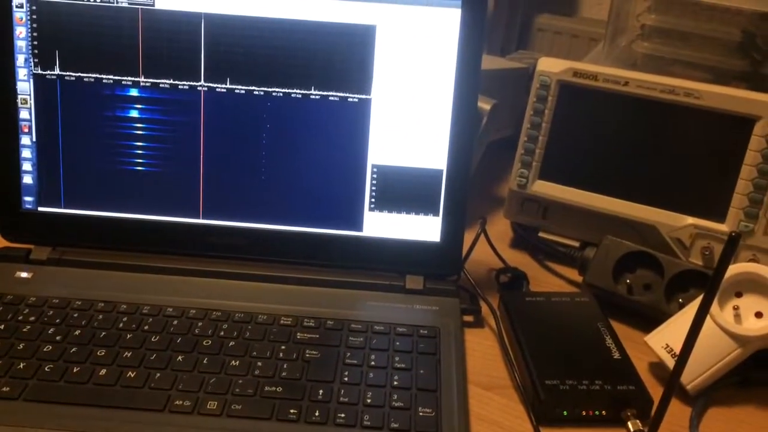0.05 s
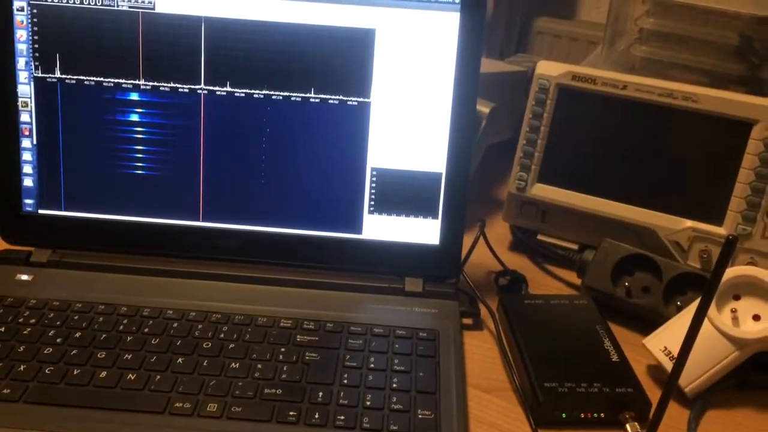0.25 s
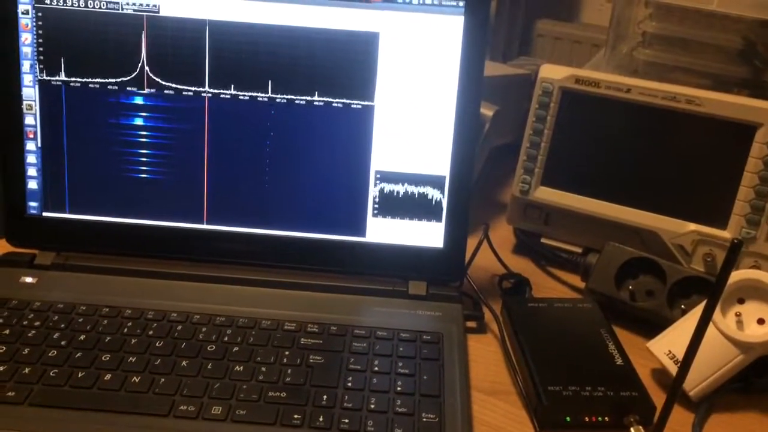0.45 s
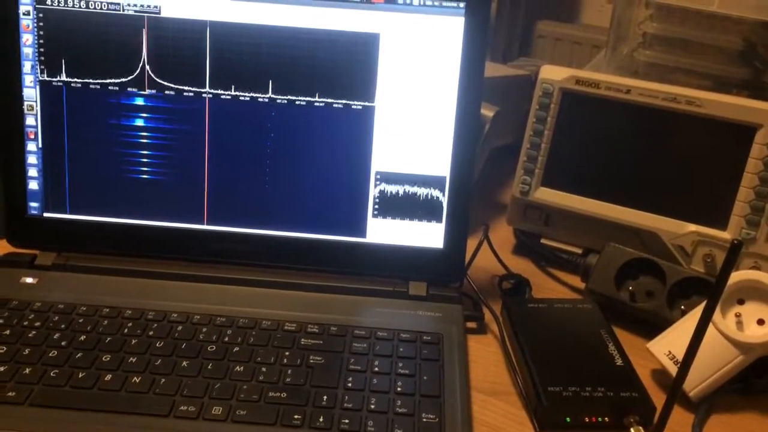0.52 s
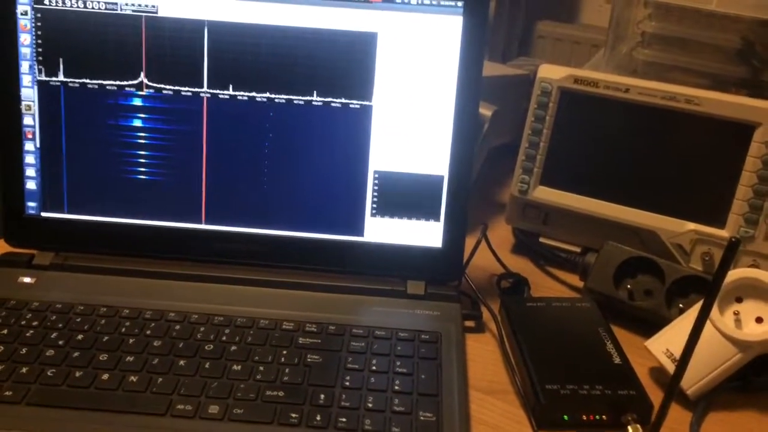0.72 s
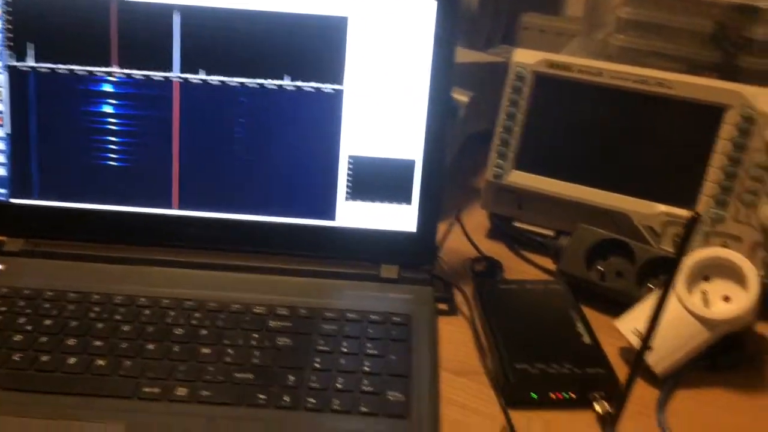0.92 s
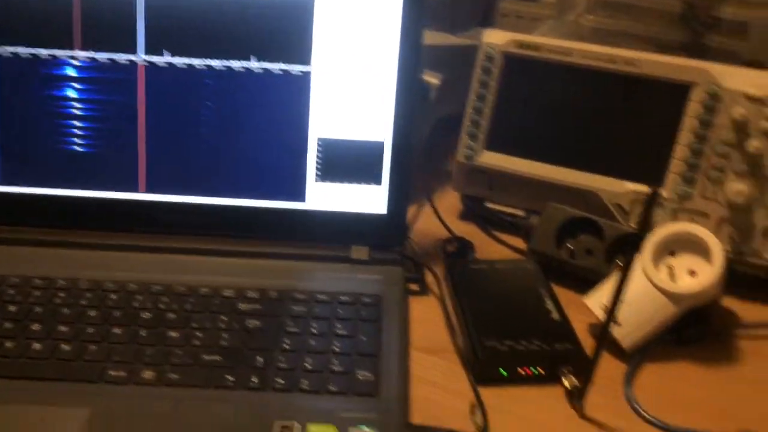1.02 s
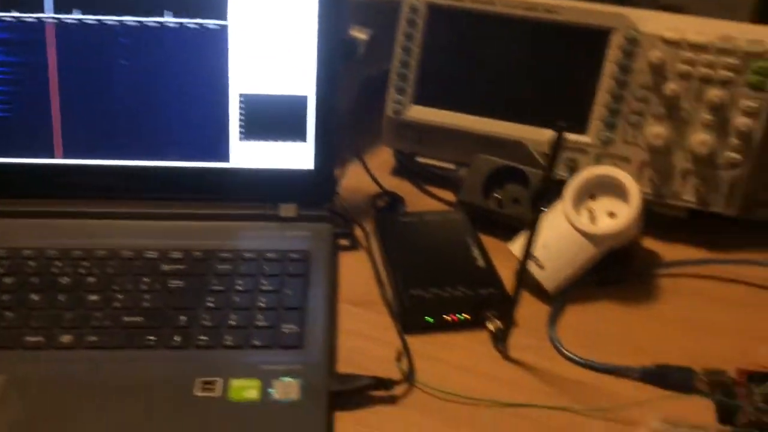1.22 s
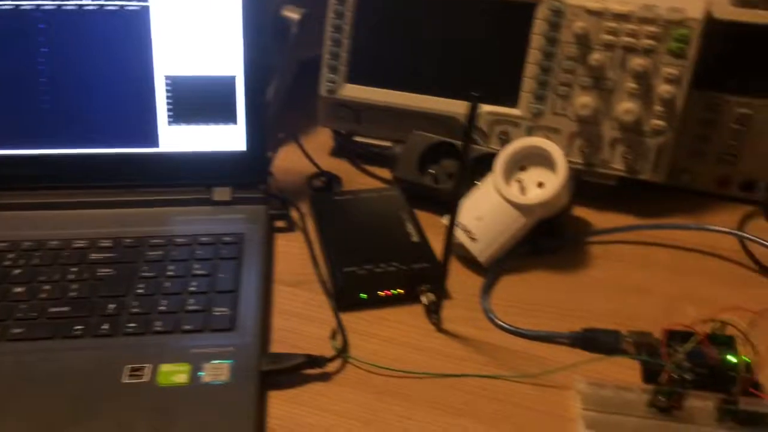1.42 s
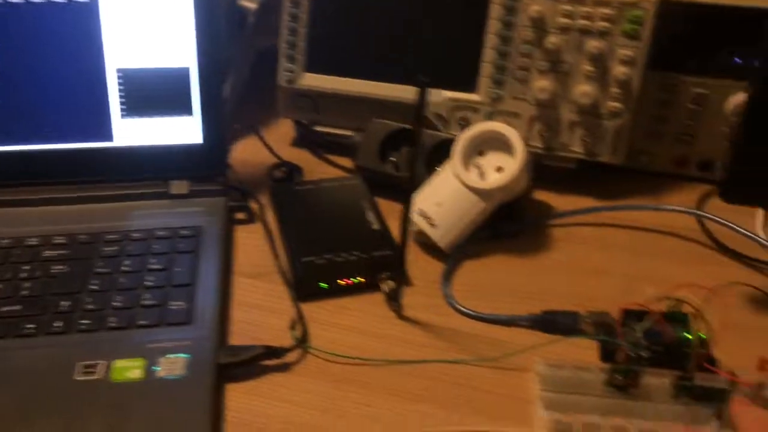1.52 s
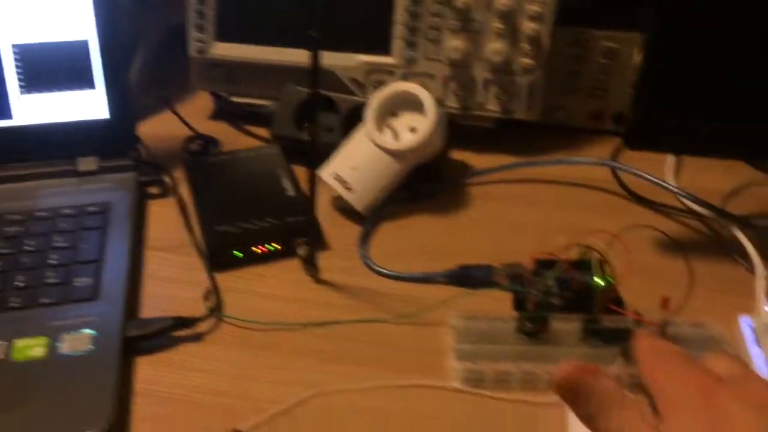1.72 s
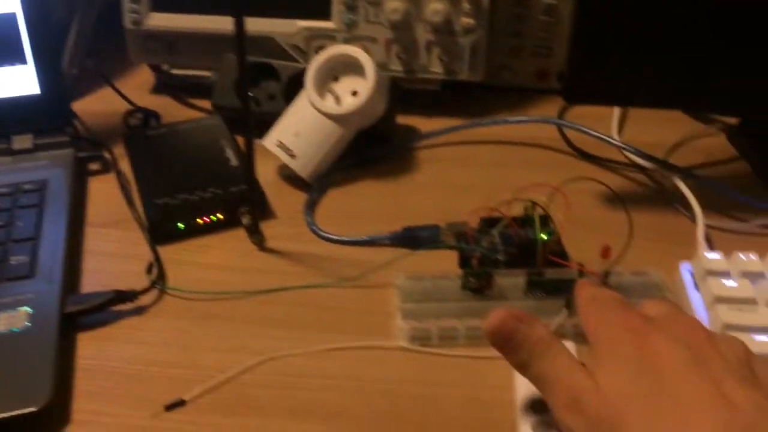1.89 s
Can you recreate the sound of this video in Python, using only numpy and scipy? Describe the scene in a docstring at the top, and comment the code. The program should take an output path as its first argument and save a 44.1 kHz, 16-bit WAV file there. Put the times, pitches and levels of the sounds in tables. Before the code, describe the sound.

A sharp button click, then a duller release click, in a quiet room.

```python
"""A desk in a quiet room: a small push-button switch is pressed and let go.
The press rings its body in a bright, gritty snap with quick echoes off the desk; plastic scuffs at the
stop and the spring twangs low. The release snaps more dully and a faint scuff follows. Underneath,
equipment fans hiss and whine softly, a sleeve rustles and a hand nudges the microphone."""
import sys
import numpy as np
from scipy import signal
from scipy.fft import rfft, irfft
from scipy.io import wavfile
from scipy.ndimage import uniform_filter1d

SR = 44100
rng = np.random.default_rng(int(sys.argv[2]) if len(sys.argv) > 2 else 0)


def transcribe(u):
    """Save the signal u as a 16-bit wav file named by the first command-line argument.

    u: samples, shape (n,) or (channels, n), limited to [-1, 1]; the rate is SR.
    q: integer samples, one column per channel.
    """
    v = np.clip(np.atleast_2d(u).T, -1, 1)
    q = np.round(v * 32767).astype(np.int16)
    wavfile.write(sys.argv[1], SR, q)


N = 85995
TIME_S = np.arange(N) / SR

# Press click and its three quick echoes off the desk: (time [s], level [dB])
PRESS_CLICKS = [(0.2025, 2), (0.2044, -24.5), (0.2056, -11.5), (0.2067, -29.5)]


def switch():
    """Press and release strike the same modes at different levels; returns direct sound, room feed."""
    # Three closely spaced clicks of the release: (time [s], level [dB])
    release_clicks = [(0.4928, 3.5), (0.4936, -5.5), (0.4946, -5)]
    # Modes of switch and mount: (frequency [Hz], t60 [s], press gain [dB], release gain [dB])
    body_modes = [(345, .025, -59.5, -46.5), (830, 0.023, -40.5, -31), (1145, 0.0044, -25, -31.5),
                  (1873, 0.0086, -25, -27.5), (2185, .008, -23, -26), (2480, 0.011, -22, -29),
                  (3480, 0.014, -21, -35.5), (4500, 0.018, -20.5, -40), (5005, .004, -24.5, -37.5),
                  (5940, .003, -13.5, -33.5), (6620, 0.0031, -12.5, -34.5), (9800, .004, -32.5, -37),
                  (13600, 0.0046, -38.5, -40)]
    # Grit of press, then release: (time [s], level [dB], tilt [dB/octave])
    cracks = [(0.2025, -22.5, 0), (0.4929, -34, -4.5)]
    press_modes = [(hz, db, t60_s) for hz, t60_s, db, _ in body_modes]
    release_modes = [(hz, db, t60_s) for hz, t60_s, _, db in body_modes]
    press, press_feed = snap(PRESS_CLICKS, press_modes, cracks[0], low_cut_hz=620)
    release, release_feed = snap(release_clicks, release_modes, cracks[1], low_cut_hz=287)
    # The release sends less treble into the room.
    low, high = (butterworth(release_feed, order=3, hz=2820, kind=kind) for kind in ("low", "high"))
    return press + release, press_feed + from_db(1.5) * low + from_db(-3.5) * high


def snap(clicks, modes, grit, low_cut_hz, body_send_db=-3, crack_send_db=2.5):
    """Clicks ring a body too small to radiate much bass; returns direct sound, room feed."""
    body = struck(impulses(clicks), modes)
    burst = crack(*grit)
    feed = from_db(body_send_db) * body + from_db(crack_send_db) * burst
    return butterworth(np.array([body + burst, feed]), order=2, hz=low_cut_hz, kind="high")


def crack(start_s, level_db, tilt_db_per_oct):
    """A few milliseconds of grit as the contact lands."""
    # Grit spectrum before tilt: (frequency [Hz], relative density [dB])
    spectrum = [(60, -29), (200, -20.5), (450, -18.5), (750, -4), (1500, -3.5), (2900, 3.5), (5300, 1.5),
                (7800, -1), (9000, -15), (15000, -20)]
    grains, envelope = friction(start_s, attack_s=1 / SR, hold_s=0.0012, release_s=0.001315)
    return from_db(level_db) * envelope * coloured(grains, spectrum, tilt_db_per_oct)


def spring(stop_s=0.279):
    """Metal parts ring on after the press; the spring twangs as the button reaches its stop."""
    # Thin modes of the metal parts: (frequency [Hz], gain [dB], t60 [s])
    metal_modes = [(881, -52.5, 0.24), (1804, -57.5, 0.5), (2272, -51.5, 0.26), (3500, -45.5, 0.24),
                   (3585, -45, 0.31), (4450, -51, 0.34), (5400, -51.5, .16)]
    # Spring modes: (frequency [Hz], level [dB], t60 [s])
    twang_modes = [(361.4, -51, .58), (378.4, -48, 0.093), (429, -44.5, 0.2), (727, -68, 0.54),
                   (1038, -49, 0.18)]
    stop = impulses([(stop_s, 0)])
    twang = sum(from_db(db) * ring(stop, hz, t60_s) for hz, db, t60_s in twang_modes)
    return struck(impulses(PRESS_CLICKS[:1]), metal_modes) + twang


def scuffs():
    """A brief slip of plastic on plastic at the stop, then a faint scuff as the finger leaves the button;
    returns direct sound, room feed."""
    # Slips: (start [s], hold [s], level [dB], room send [dB])
    slips = [(0.274, 0.0069, -34.5, 0), (0.9136, 0.0097, -52.5, 1)]
    # Slip spectra: (frequency [Hz], relative density of first [dB], of second [dB])
    spectra = [(170, -35.5, -18), (390, 0, -2.5), (530, -15, 0), (1090, -3.5, -9), (1870, -0.5, -10),
               (2350, 1.5, 2), (3180, -4, 1.5), (4560, 2, 1), (6740, -4, 2), (8800, -13.5, -5),
               (9500, -13.5, 5), (11200, -16, -5), (12140, -5, 6), (15000, -7, -8.5)]
    direct, feed = np.zeros((2, N))
    for k, (start_s, hold_s, level_db, send_db) in enumerate(slips):
        spectrum = [(hz, levels_db[k]) for hz, *levels_db in spectra]
        grains, envelope = friction(start_s, attack_s=0.0016, hold_s=hold_s, release_s=0.0031)
        slip = from_db(level_db) * envelope * coloured(grains, spectrum)
        direct += slip
        feed += from_db(send_db) * slip
    return direct, feed


def friction(start_s, attack_s, hold_s, release_s, grains_per_s=16000):
    """Dense random friction grains of unit rms and, separately, their envelope."""
    grains = unit_rms(rng.standard_normal(N) * (rng.random(N) < grains_per_s / SR))
    age_s = TIME_S - start_s
    rise = np.clip(age_s / attack_s, 0, 1)
    fall = np.exp(-np.maximum(age_s - hold_s, 0) / release_s)
    return grains, rise * fall


def impulses(clicks):
    """One impulse per (time [s], level [dB]) row."""
    train = np.zeros(N)
    for time_s, db in clicks:
        train[int(time_s * SR)] += from_db(db)
    return train


def struck(force, modes):
    """Parallel modes driven by one force, with alternating signs."""
    return sum((-1) ** k * from_db(db) * ring(force, hz, t60_s)
               for k, (hz, db, t60_s) in enumerate(modes))


def ring(force, hz, t60_s):
    """One damped mode; a unit impulse rings it at amplitude 1."""
    radius = from_db(-60 / (t60_s * SR))
    angle_rad = 2 * np.pi * hz / SR
    return signal.lfilter([.5, 0, -.5], [1, -2 * radius * np.cos(angle_rad), radius ** 2], force + 1e-18)


def room(feed, delay_s=0.00067, build_s=0.00071):
    """Diffuse reflections that die away band by band."""
    # Reflection spectrum: (frequency [Hz], gain [dB])
    band_gains = [(100, 8), (300, 7.5), (420, 5), (560, 1), (850, 4), (1400, -1.5), (2300, -3.5),
                  (3000, -4.5), (3500, -6.5), (4000, -8.5), (4600, -7), (5500, -8.5), (6700, -13),
                  (10000, -6.5), (15000, -13)]
    # Reverberation time: (frequency [Hz], t60 [s])
    band_t60s = [(150, .36), (500, 0.19), (1400, 0.23), (3700, 0.25), (7000, 0.29), (14000, .22)]
    hz = np.fft.rfftfreq(N, 1 / SR)
    white = rfft(rng.standard_normal(N))
    edges_hz = np.geomspace(60, 18000, 41)
    age_s = np.maximum(TIME_S - delay_s, 0)
    build = 1 - np.exp(-age_s / build_s)
    response = np.zeros(N)
    for low_hz, high_hz in zip(edges_hz, edges_hz[1:]):
        centre_hz = np.sqrt(low_hz * high_hz)
        decay = from_db(-60 * age_s / at_hz(band_t60s, centre_hz))
        band = irfft(white * (hz >= low_hz) * (hz < high_hz), N) * decay * build
        unity_gain_rms = np.sqrt(2 * (high_hz - low_hz) / SR / N)
        response += unit_rms(band) * unity_gain_rms * from_db(at_hz(band_gains, centre_hz))
    return signal.fftconvolve(feed, response)[:N]


def fans(air_db=-68.5, whine_db=-79.5, whine_hz=855, wander_hz=2.376):
    """Steady air noise with one slightly wandering blade tone."""
    # Air noise spectrum: (frequency [Hz], relative density [dB])
    spectrum = [(24, -32.5), (40, -1), (142, -1.5), (298, -6), (364, -8), (582, -8), (845, -4), (910, -4),
                (1230, -3.5), (1460, -7), (1610, -5.5), (2170, -13), (3220, -14), (5430, -20.5),
                (15000, -26)]
    air = coloured(rng.standard_normal(N), spectrum)
    wander = unit_rms(uniform_filter1d(rng.standard_normal(N), size=4000))
    whine = np.sin(2 * np.pi * np.cumsum(whine_hz + wander_hz * wander) / SR)
    return from_db(air_db) * air + from_db(whine_db) * unit_rms(whine)


def handling(rustle_db=-71.5):
    """A sleeve rustles as the arm moves; the hand nudges the microphone."""
    # Sleeve spectrum: (frequency [Hz], relative density [dB])
    spectrum = [(60, -17), (250, 5), (600, 4), (1300, 0.5), (2600, -2.5), (6000, -22), (15000, -27)]
    # Soft hand bumps: (time [s], level [dB], pitch [Hz])
    bumps = [(0.70, -67.5, 76), (1.13, -69, 55), (1.31, -78.5, 140), (1.46, -76, 85), (1.581, -72.5, 94.3),
             (1.72, -69.5, 62)]
    cloth = coloured(rng.standard_normal(N), spectrum)
    sound = from_db(rustle_db) * swell(centre_s=1.233, sigma_s=0.084) * cloth
    for time_s, db, hz in bumps:
        tone = unit_rms(np.sin(2 * np.pi * (hz * TIME_S + rng.random())))
        sound += from_db(db) * swell(time_s, sigma_s=0.013) * tone
    return sound


def swell(centre_s, sigma_s):
    """Gaussian envelope of height 1."""
    return np.exp(-.5 * ((TIME_S - centre_s) / sigma_s) ** 2)


def coloured(noise, spectrum, tilt_db_per_oct=0):
    """Noise shaped by a spectrum and a tilt; unit rms."""
    hz = np.maximum(np.fft.rfftfreq(N, 1 / SR), 1)
    gain_db = at_hz(spectrum, hz) + tilt_db_per_oct * np.log2(hz)
    return unit_rms(irfft(rfft(noise) * from_db(gain_db), N))


def at_hz(table, hz):
    """Table lookup on a log-frequency axis."""
    knots_hz, values = np.transpose(table)
    return np.interp(np.log(np.maximum(hz, 1)), np.log(knots_hz), values)


def butterworth(x, order, hz, kind):
    """Low- or high-pass filter."""
    return signal.sosfilt(signal.butter(order, hz, kind, fs=SR, output="sos"), x)


def from_db(db):
    """Decibels to gain."""
    return 10 ** (np.asarray(db) / 20)


def unit_rms(x):
    """Scale to unit rms."""
    return x / np.sqrt(np.mean(x ** 2) + 1e-20)


def scene():
    """Switch, reflections, fans and handling in mono."""
    snaps, snap_feed = switch()
    slips, slip_feed = scuffs()
    return (snaps + slips + spring() + room(snap_feed + slip_feed) + fans() + handling())[None]


def record(dry):
    """Rumble roll-off and a steep top cut."""
    rumble_cut_hz, top_cut_hz = 38, 15200
    high_passed = butterworth(dry, order=4, hz=rumble_cut_hz, kind="high")
    return signal.sosfilt(signal.ellip(10, .2, 70, top_cut_hz, fs=SR, output="sos"), high_passed)


dry = scene()
out = record(dry)
transcribe(out)
```